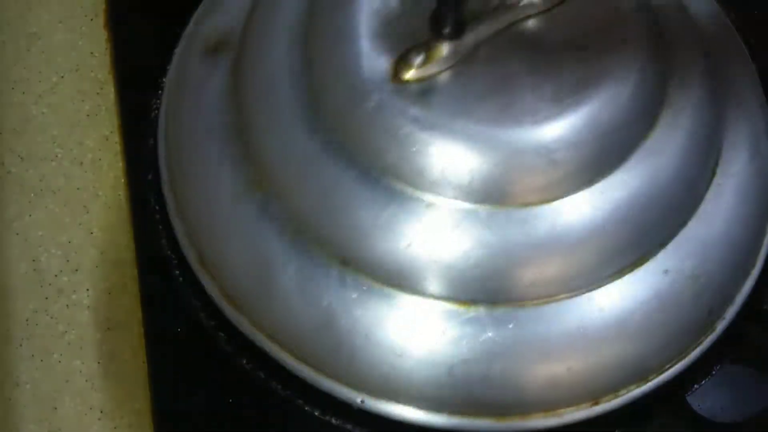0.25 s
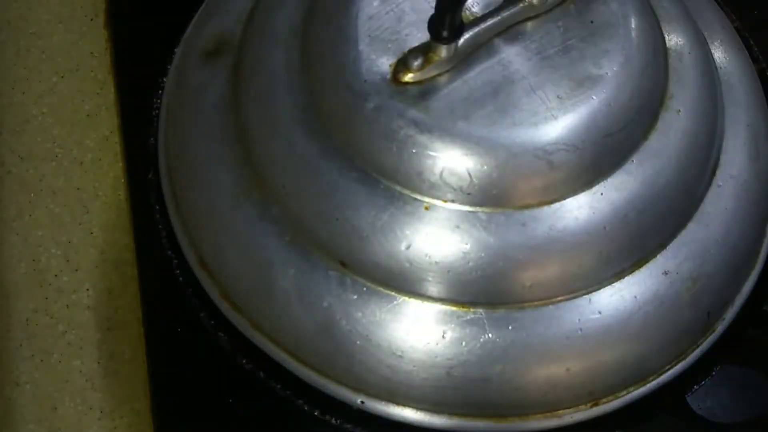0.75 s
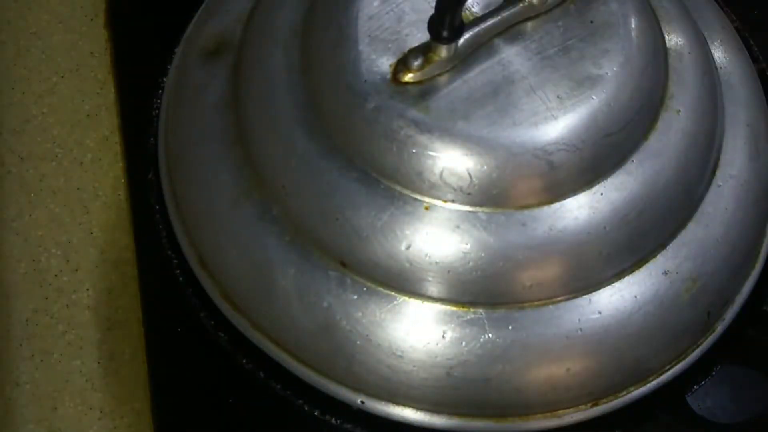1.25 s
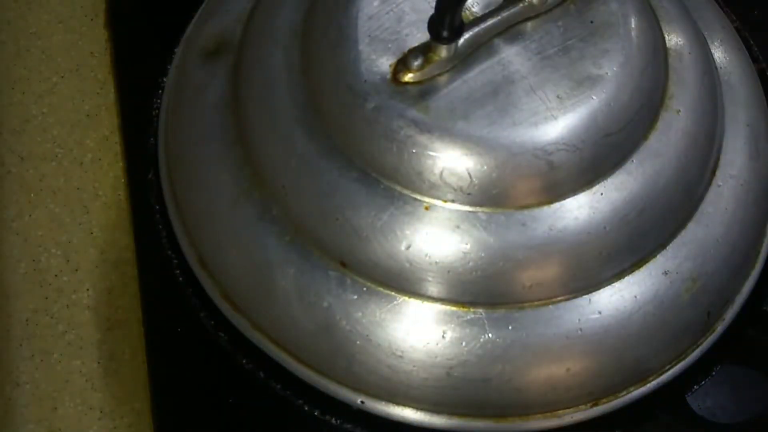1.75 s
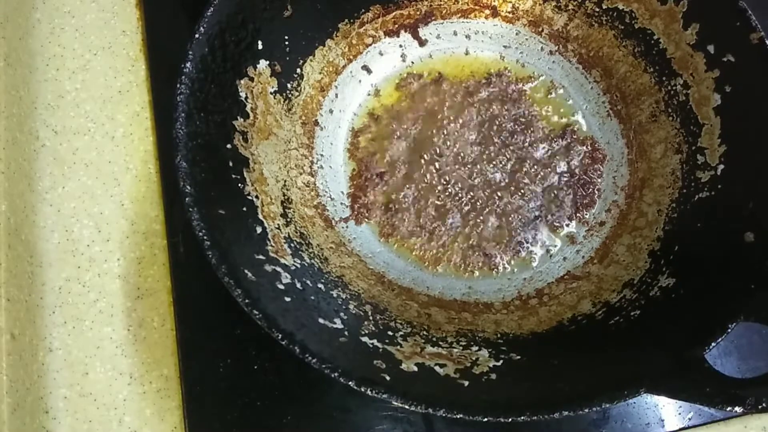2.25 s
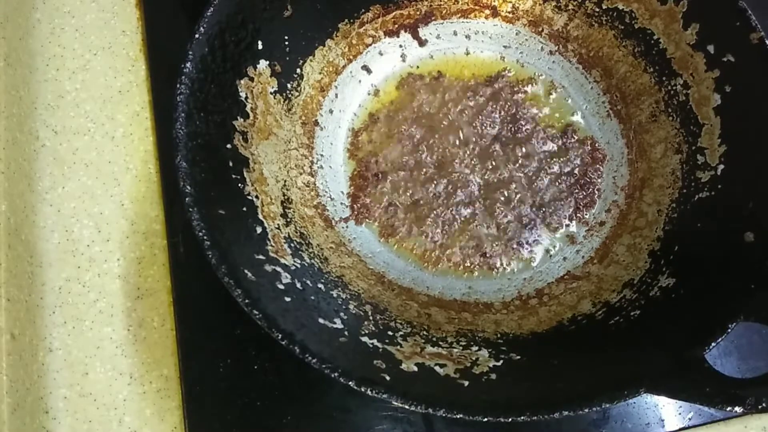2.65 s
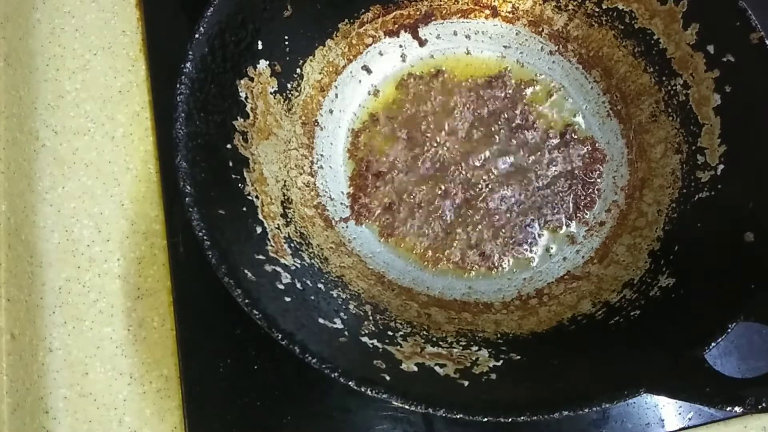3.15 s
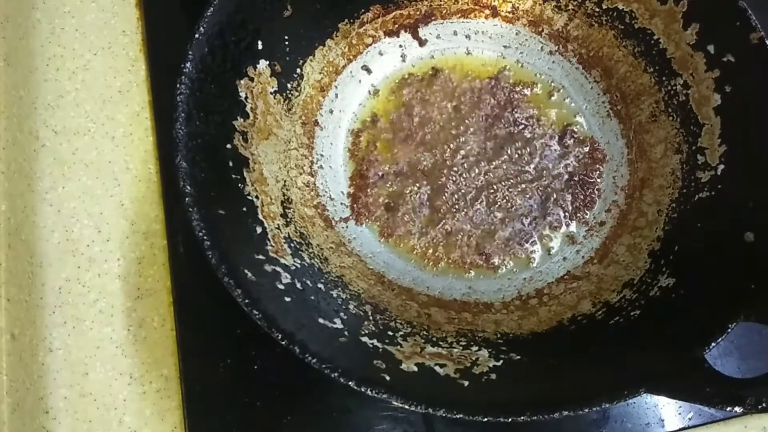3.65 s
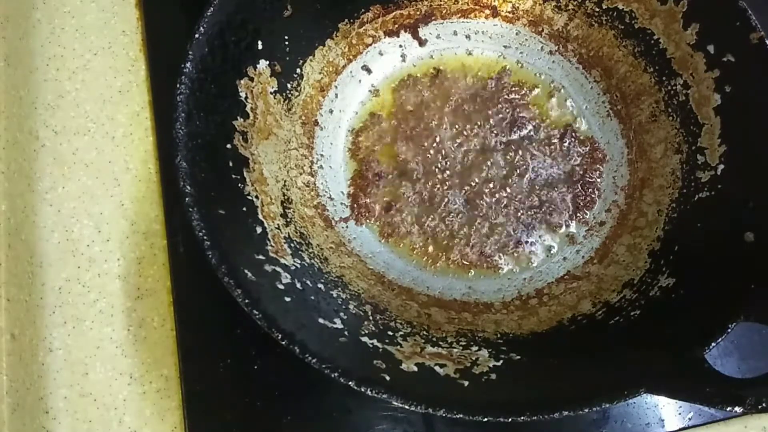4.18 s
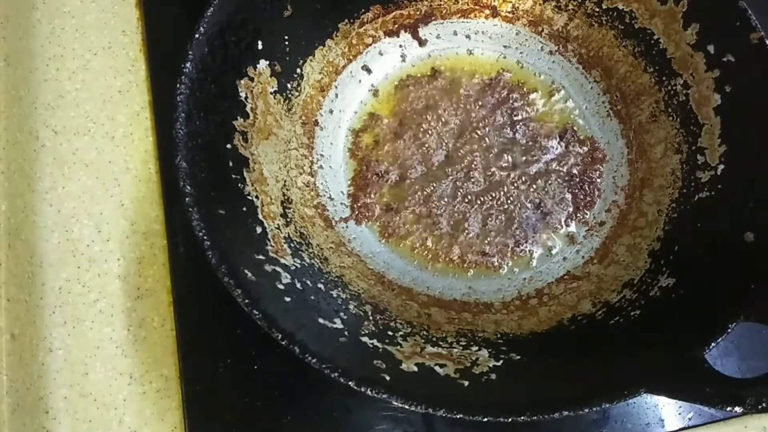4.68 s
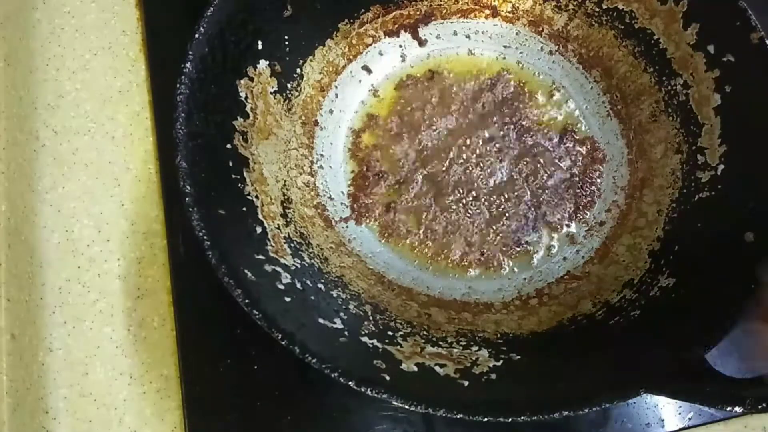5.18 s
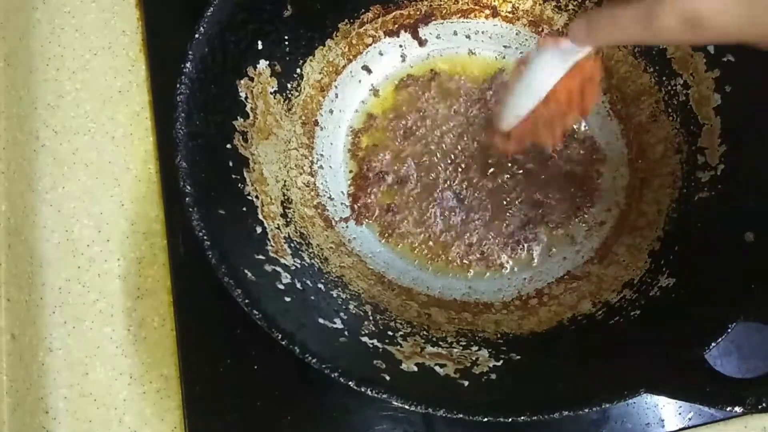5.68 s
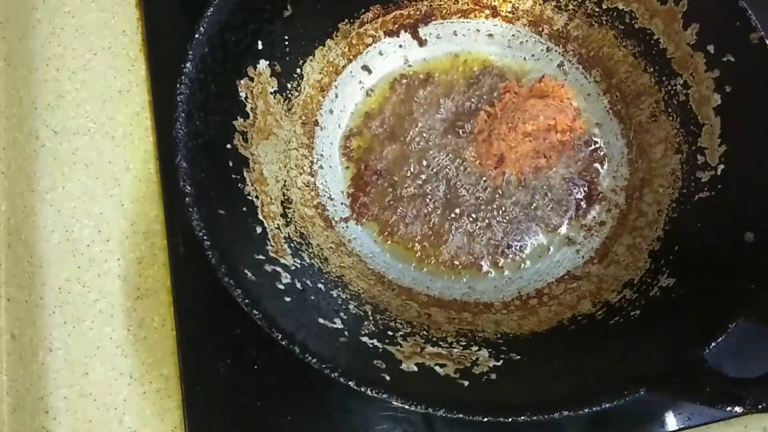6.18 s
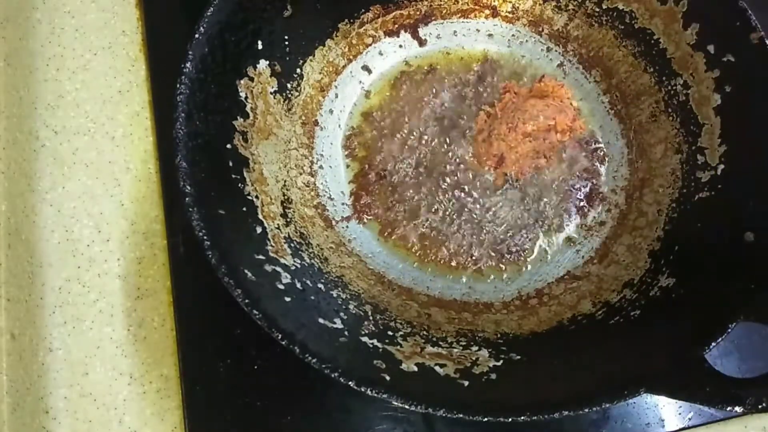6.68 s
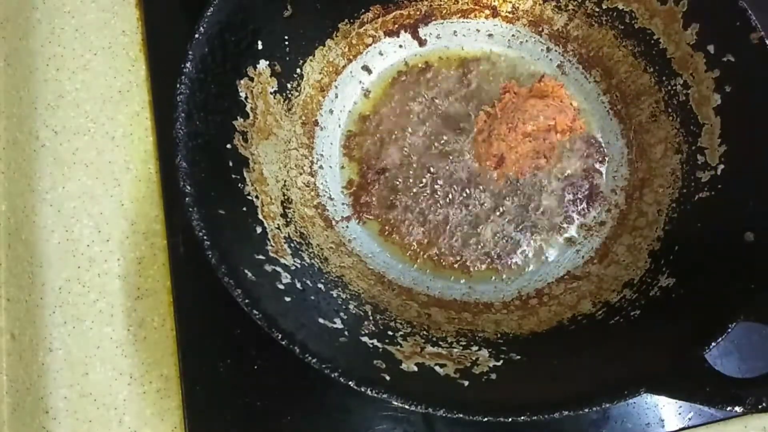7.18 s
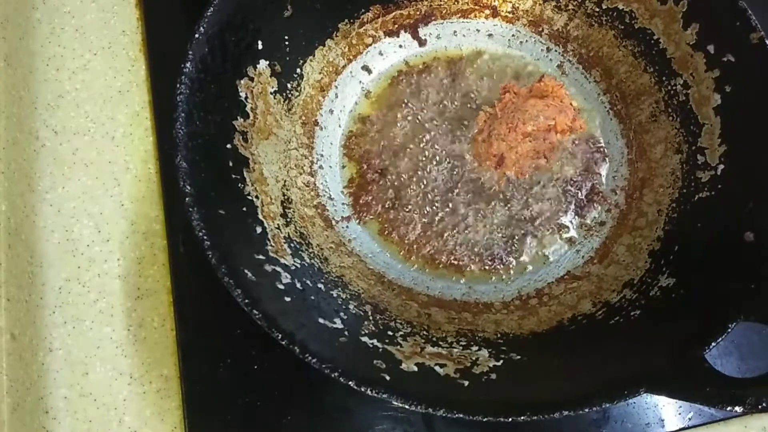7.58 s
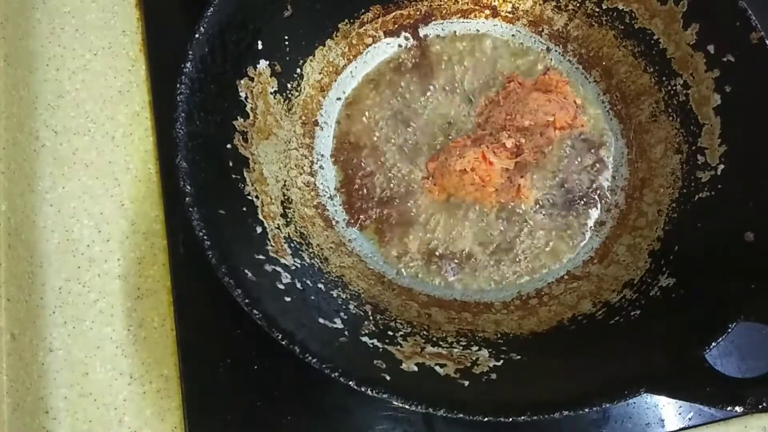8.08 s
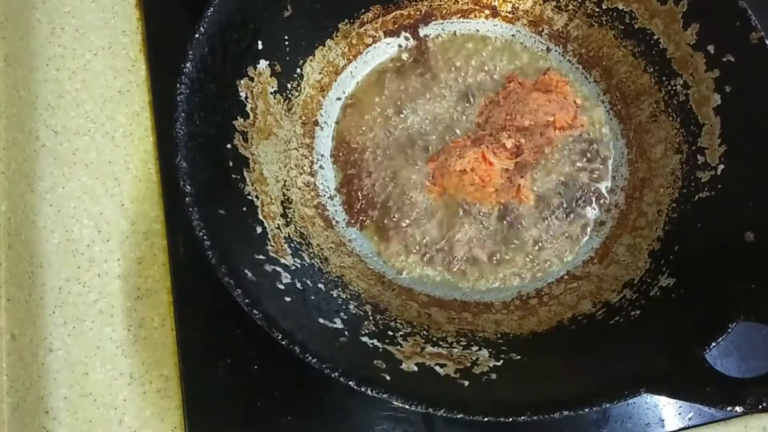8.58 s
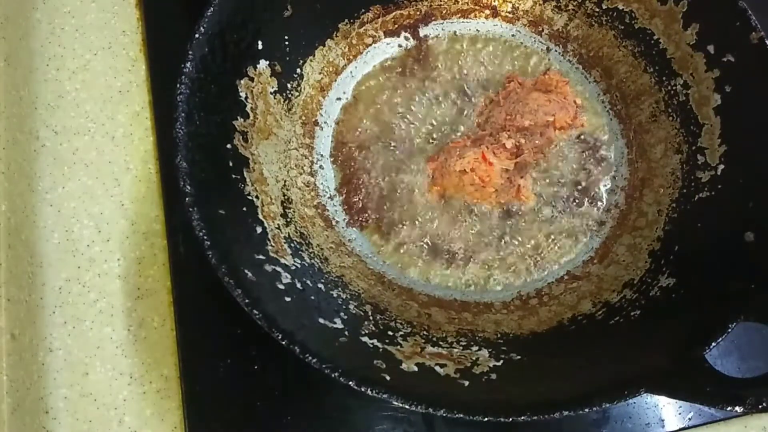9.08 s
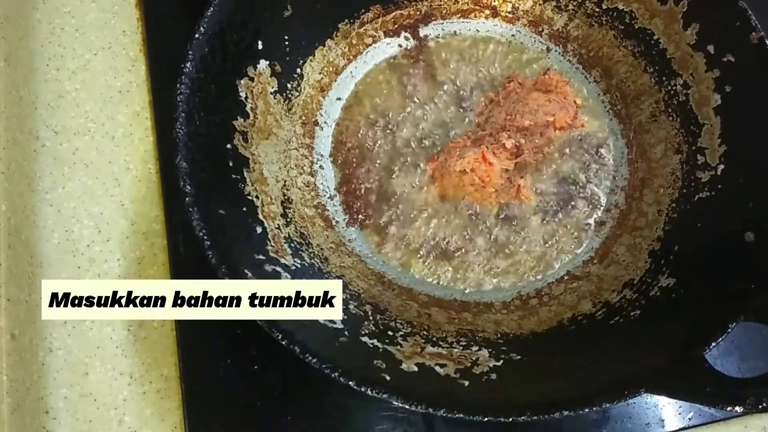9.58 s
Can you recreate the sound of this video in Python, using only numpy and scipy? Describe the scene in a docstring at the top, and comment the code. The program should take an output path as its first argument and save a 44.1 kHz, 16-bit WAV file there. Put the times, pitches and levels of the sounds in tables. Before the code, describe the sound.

A handheld stereo microphone sits close to a pan in a small kitchen with low rumble and faint stove hum. At 0 s a metal lid clanks, scrapes and rings in several quick contacts; a low knock at 0.4 s is followed by light rocking taps that fade. Beneath, frying is quiet, muffled and hollow, with soft gulping notes. At about 2 s a tiny dropout cuts to open oil, rapidly much louder: crisp crackle, irregular pops, snaps and spitting droplets, with faint low steam whistles at first. A short dull knock lands at 4.45 s. From 5.9 s wet paste makes the sizzle denser, brighter and hissier, with fewer distinct pops; a soft low knock follows at 6.3 s. Another tiny dropout comes at 8.04 s, then a left-side microphone bump at 8.3 s. The fizz continues, flaring briefly at 9.4 s, with a short sharp steam squeak at 9.65 s.

```python
"""A small kitchen, a hand-held camera's two microphone ports close to a wok of sizzling oil, a stove humming.
A metal lid clanks, rocks and muffles the frying; with it off, bubbles crackle, spit and whistle, and
a spoonful of wet spice paste turns the crackle into a denser, brighter fizz.
Frying is short bubble bursts and filtered hiss; metal is dying modes and scraping noise; knocks are
low notes with clatter; whistles are unsteady tones; rumble is shaped noise and hum is sines."""
import sys
import numpy as np
from scipy import signal
from scipy.fft import rfft, irfft
from scipy.io import wavfile
from scipy.ndimage import uniform_filter1d

SR = 44100
rng = np.random.default_rng(int(sys.argv[2]) if len(sys.argv) > 2 else 0)


def generate_wav(sig):
    """Save sig (samples, or channels by samples) to the path in sys.argv[1] as 16-bit PCM at SR."""
    pcm = np.round(np.clip(np.atleast_2d(sig).T, -1, 1) * 32767).astype(np.int16)
    wavfile.write(sys.argv[1], SR, pcm)


N = 433944
TIME, FREQ = np.arange(N) / SR, np.fft.rfftfreq(N, 1 / SR)
LID_OFF_S, PASTE_IN_S = 2.025, 5.88


def amp(db):
    """Decibels to gain."""
    return 10 ** (np.asarray(db) / 20)


def unit(x):
    """Scales to rms 1."""
    return x / np.sqrt(np.mean(x ** 2) + 1e-20)


def read(points, hz=FREQ):
    """Reads a spectrum on a log-frequency axis."""
    f, value = np.transpose(points)
    return np.interp(np.log(hz + 1), np.log(f), value)


def colour(x, gain):
    """Filters a full-length sound by a gain at each frequency."""
    return irfft(rfft(x) * gain, N)


def band(x, lo_hz, hi_hz, order=2):
    """Causal band-pass."""
    edges = [lo_hz, min(hi_hz, SR / 2 - 1)]
    return signal.sosfilt(signal.butter(order, edges, "band", fs=SR, output="sos"), x)


def add(mix, s, sound):
    """Mixes a sound in at time s."""
    part = mix[:, max(round(s * SR), 0):][:, :sound.shape[-1]]
    part += sound[..., :part.shape[1]]


def fade(t, t60):
    """Exponential decay by 60 dB in t60 seconds."""
    return np.exp(-np.log(1000) * t / t60)


def ring(modes, spread):
    """Dying modes; each reaches the two ports with its own phase."""
    t = TIME[:SR]
    skews = spread * rng.standard_normal((len(modes), 1, 1)) * np.array([[-1], [1]])
    out = 0
    for (hz, db, t60), skew in zip(modes, skews):
        phase = 2 * np.pi * hz * t + skew * min(hz / 2000, 1)
        out = out + amp(db) * fade(t, t60) * np.sin(phase)
    return out


# kitchen rumble before levelling: (frequency [Hz], relative level [dB])
RUMBLE_SPECTRUM = [(20, -32), (30, -15), (48, -5), (80, -1.5), (140, 4), (195, 0), (260, -3.5), (420, -6),
                   (800, -15), (1400, -18), (2000, -14), (8000, -35)]
# stove hum: (frequency [Hz], rms level before wavering [dB])
STOVE_HUM = [(99.6, -65), (196, -74.5)]


def kitchen(rumble_db=-62, waver_db=2.0, apart=0.57):
    """Low rumble, nearly the same at both ports, and the wavering hum of the stove."""
    noise = rng.standard_normal(N) + apart * rng.standard_normal((2, N))
    rumble = unit(colour(noise, amp(read(RUMBLE_SPECTRUM))))
    waver = amp(waver_db * unit(colour(rng.standard_normal(N), np.exp(-FREQ / 6))))
    hum = 0
    for hz, db in STOVE_HUM:
        hum = hum + amp(db) * np.sqrt(2) * np.sin(2 * np.pi * (hz * TIME + rng.random()))
    return amp(rumble_db) * rumble + waver * hum


def bubbles(per_s, spread_db, largest_db, lo_hz, hi_hz, cycles, echo, echo_t60, count=22):
    """Countless bursts of a few cycles each, scattered by the curved wall of the wok."""
    t, out = TIME[:768], np.zeros((2, N))
    for hz in np.linspace(lo_hz, hi_hz, count):
        at = rng.integers(0, N, int(per_s * N / SR / count))
        # sizes are skewed towards small bubbles and level off at the largest
        size_db = largest_db * np.tanh(spread_db * rng.exponential(1, len(at)) / largest_db)
        clicks = np.zeros(N)
        clicks[at] = amp(size_db) * rng.choice([-1, 1], len(at))
        grain = unit(np.sin(2 * np.pi * hz * t) * np.sqrt(t) * np.exp(-t * hz / cycles))
        scatter = unit(rng.standard_normal((2, len(t))) * fade(t, echo_t60))
        paths = echo * scatter / np.sqrt(len(t))
        paths[[0, 1], rng.integers(0, 5, 2)] += 1  # direct sound, up to 4 samples late
        heard_grain = signal.fftconvolve(paths, grain[None])[:, :len(t)]
        out += signal.oaconvolve(clicks[None], heard_grain, axes=1)[:, :N]
    # every pitch is given a nearly equal share of the power
    spectrum = rfft(out)
    power = uniform_filter1d(abs(spectrum) ** 2, size=3000, axis=1)
    return unit(irfft(spectrum / np.sqrt(power + 1e-6 * power.mean()), N))


def ticks(lo_hz, hi_hz, range_db, shortest_cycles, longest_cycles, count):
    """Single bubbles near the surface, from a dry snap to a tiny pitched ping."""
    out, t = np.zeros((2, N)), TIME[:384]
    for when, pitch, size, length, left_turns, right_turns in rng.random((count, 6)):
        hz = lo_hz + (hi_hz - lo_hz) * pitch
        cycles = shortest_cycles * (longest_cycles / shortest_cycles) ** length
        tone = np.sin(2 * np.pi * (hz * t + np.array([[left_turns], [right_turns]])))
        ping = tone * (1 - np.exp(-t * hz)) * np.exp(-t * hz / cycles)
        add(out, when * N / SR, amp(-range_db * size) * unit(ping))
    return unit(out)


# frying colour in open oil, with wet paste, and leaking past the lid: (frequency [Hz], relative level [dB])
OPEN_OIL_COLOUR = [(200, -102), (550, -15), (720, -29.5), (880, -17.5), (1250, -23), (1480, -9),
                   (1900, -5.5), (2200, -8.5), (3600, -3), (4700, 0.5), (5800, 0), (6800, -8), (9200, -12),
                   (11500, -20.5), (15000, -17.5)]
WET_PASTE_COLOUR = [(200, -64), (550, -23), (740, -26.5), (900, -19), (1200, -20), (1900, -12),
                    (2400, -11.5), (3600, -7), (4700, 0), (5800, 0), (6800, -8), (9200, -10.5),
                    (11500, -19), (15000, -15)]
UNDER_LID_COLOUR = [(200, -19), (550, -17), (800, -35), (1400, -27), (1900, -17.5), (2800, -18.7),
                    (3400, -18), (4200, -18), (4700, -11), (6000, -12), (7000, -16), (9200, -18.5),
                    (11500, -27), (15000, -26)]
# resonances of the air under the lid: (frequency [Hz], width [Hz], lift [dB])
LID_AIR_RESONANCES = [(470, 52, 11), (615, 46, 15.5), (890, 40, 11), (1025, 240, 22), (1640, 69, 15),
                      (1730, 54, 13), (2047, 84, 14.5), (2290, 110, 8), (2500, 130, 12), (2775, 74, 9.5),
                      (3100, 110, 10), (3740, 170, 7), (3930, 90, 7.5), (4600, 160, 7), (4900, 90, 4),
                      (5460, 150, 9), (6030, 120, 8.5)]
# how hard the oil boils covered, as the lid comes off, in the open, and with the paste in;
# levels before each stage's trim: (time [s], fine bubbles level [dB], coarse bubbles level [dB])
COVERED_BOIL = [(0.3, -54, -65.5), (0.48, -57.5, -69), (1.97, -58, -68.5)]
UNCOVERING_BOIL = [(2.06, -58, -63), (2.102, -48, -47), (2.27, -42, -48)]
OPEN_BOIL = [(2.33, -40, -44.5), (5.78, -40.5, -46.5), (5.85, -40, -46)]
PASTE_BOIL = [(5.9, -40, -44), (6.01, -38, -44), (8.14, -38, -44.5), (8.23, -38.5, -41.5),
              (8.36, -38.5, -44.5), (9.33, -38.5, -45.5), (9.38, -38.5, -42.5), (9.45, -38.5, -47.5),
              (9.6, -39.5, -46.5)]
SPLIT_HZ = 3420  # coarse bubbles sound mostly below this pitch, fine ones above
TICKS_DB = -7.5  # single ticks against the fine fizz


def frying(lid_hiss=1.2, open_hiss=0.39, paste_hiss=0.78, surge_db=1.52, smooth_hz=12500):
    """Fine and coarse bubbles and sharp ticks surge over hiss, coloured by the state of the pan."""
    fine = bubbles(per_s=4000, spread_db=7.0, largest_db=18.0, lo_hz=3750, hi_hz=12760,
                   cycles=2.1, echo=1.1, echo_t60=0.04)
    coarse = bubbles(per_s=1300, spread_db=3.5, largest_db=10, lo_hz=699, hi_hz=4210,
                     cycles=1.98, echo=0.78, echo_t60=0.037)
    snaps = ticks(lo_hz=3536, hi_hz=13100, range_db=10.5, shortest_cycles=1.4,
                  longest_cycles=10.4, count=2000)
    fine = unit(fine + amp(TICKS_DB) * snaps)
    unrest = unit(colour(rng.standard_normal(N), 1 / (1 + (FREQ / 30) ** 2)))
    surge = amp(stirring() + surge_db * unrest)
    hollow_db = sum(db / (1 + (2 * (FREQ - hz) / width) ** 2) for hz, width, db in LID_AIR_RESONANCES)
    low_share = 1 / (1 + (FREQ / SPLIT_HZ) ** 10)
    merged = 0.79 / (1 + (smooth_hz / (FREQ + 1)) ** 10)  # the tiniest bubbles merge into hiss
    sizes = []
    for grains, share in ((fine, 1 - low_share), (coarse, low_share)):
        sizes.append((rfft(grains * surge), rfft(rng.standard_normal((2, N))), share))

    def stage(boil, shape_db, hiss_share, fine_db, coarse_db):
        """The frying in one state of the pan, crackle and hiss following its boil levels."""
        s, fine_curve, coarse_curve = np.transpose(boil)
        blend, out = hiss_share + merged, np.zeros((2, N))
        curves = (fine_curve + fine_db, coarse_curve + coarse_db)
        for (crackle, hiss, share), curve in zip(sizes, curves):
            gain = amp(shape_db) * np.sqrt(share / (1 + blend ** 2))
            sound = irfft((crackle + blend * hiss) * gain, N)
            out += amp(np.interp(TIME, s, curve)) * sound / sound.mean(0).std()
        return out

    covered = stage(COVERED_BOIL, read(UNDER_LID_COLOUR) + hollow_db, lid_hiss,
                    fine_db=5.0, coarse_db=6.5)
    uncovered = stage(UNCOVERING_BOIL + OPEN_BOIL, read(OPEN_OIL_COLOUR), open_hiss,
                      fine_db=-0.07, coarse_db=0.7)
    with_paste = stage(PASTE_BOIL, read(WET_PASTE_COLOUR), paste_hiss, fine_db=1.35, coarse_db=0.5)
    lid_off = np.where(TIME < PASTE_IN_S, uncovered, with_paste)
    return np.where(TIME < LID_OFF_S, covered, lid_off)


# ring of the wok: (frequency [Hz], relative level [dB], decay t60 [s])
WOK_MODES = [(1056, 17, 0.058), (1225, 10, 0.32), (1389, 5.5, 0.61), (1530, 8, 0.21), (1654, 12.5, 0.2),
             (1963, 14, 0.18), (2946, 13, 0.12), (3700, 7, 0.16)]


def wok(x, ring_db=6.0):
    """The bursts set the iron ringing faintly, by convolution with its dying modes."""
    tail = ring(WOK_MODES, spread=0.24)
    return x + amp(ring_db) * signal.oaconvolve(x, tail / abs(rfft(tail)).max(), axes=1)[:, :N]


# ring of the lid: (frequency [Hz], relative level [dB], decay t60 [s])
LID_MODES = [(80.1, -4.5, 0.87), (134.2, -6.5, 0.54), (305, -9, 0.23), (460.6, -2.5, 0.35), (482, 10, 0.13),
             (524, -4, 0.24), (618, -4, 0.4), (703, 1, 0.3), (1027, -2, 0.3), (1043, 1, 0.35),
             (1092, -0.5, 0.36), (1370, -14, 0.56), (1713, -4, 0.48), (1950, -1, 0.2), (2040, 12.5, 0.15),
             (2136, -3.5, 0.55), (2480, -9, 0.33), (2540, 1.5, 0.19), (2630, -6, 0.15), (2880, 2, 0.19),
             (3010, -14, 0.3), (3330, -12, 0.33), (3763, -2, 0.16), (4040, -9, .16), (4130, -12, 0.25),
             (4280, 0, 0.22), (4740, -5, 0.22), (5240, 0, 0.17), (5360, -4, .2)]
# the lid rubs and bumps on the rim: (time [s], level [dB], lowest excited [Hz], highest excited [Hz],
# scrape against the ring [dB], rise [s])
LID_CLANKS = [(0.0, -34.5, 600, 7000, -3.5, 0.00045), (0.062, -40, 60, 750, -8, 0.013),
              (0.097, -36, 80, 1150, -8, .0016), (0.121, -47.5, 900, 3500, -3, 0.0014),
              (.252, -61, 60, 700, -10, .004)]
# the rim jostles the modes a little, and they reach the two ports slightly out of phase (radians)
LID_CHATTER, LID_SPREAD = 0.38, 0.55


def lid(chatter_hz=45, scrape_t60=0.38, scrape_bright=0.94, rubbed_t60=0.033, rasp_db=-3, rasp_from_hz=3500):
    """The lid rings, chatters and scrapes; soft contacts ring low modes, glancing ones high modes."""
    out, t = np.zeros((2, N)), TIME[:SR]
    attack = round(.04 * SR)  # levels are set over the first 40 ms
    # the same modes, damped by the contact
    rubbed = ring([(hz, level, rubbed_t60) for hz, level, _ in LID_MODES], spread=0)
    knots = np.arange(200) / chatter_hz
    for s, db, low_hz, soft_hz, scrape_db, rise_s in LID_CLANKS:
        tone, rise = np.zeros((2, SR)), 1 - np.exp(-t / rise_s)
        for hz, level, t60 in LID_MODES:
            chatter = 1 + LID_CHATTER * np.interp(t, knots, rng.standard_normal(len(knots)))
            mode = ring([(hz, level, t60)], spread=LID_SPREAD)
            unexcited = np.sqrt((1 + (hz / soft_hz) ** 4) * (1 + (low_hz / hz) ** 2))
            tone += chatter * mode * rise / unexcited
        friction = rng.standard_normal(SR) + 1.04 * rng.standard_normal((2, SR))
        rubbing = unit(signal.fftconvolve(friction, rubbed, axes=1)[:, :SR])
        rubbing = rubbing + amp(rasp_db) * unit(band(friction, rasp_from_hz, 6700, order=4))
        scrape = band(rubbing, 57, scrape_bright * soft_hz, order=2) * fade(t, scrape_t60) * rise
        ringing = tone / tone[:, :attack].std()
        scraping = scrape / scrape[:, :attack].std()
        add(out, s, amp(db) * (ringing + amp(scrape_db) * scraping))
    return out


# drips under the lid strike the pan and ring the lid: (time [s], level before blip_db [dB])
LID_DRIPS = [(0.296, -53), (0.565, -57), (0.816, -52.5), (1.202, -56), (1.347, -53)]


def blips(hz=1040, t60=0.13, rise_s=0.0063, blip_db=6.5, faint_db=-61, count=24):
    """Drips under the lid strike the pan and ring a hollow note of the lid; fainter ones come at random."""
    out, t = np.zeros((2, N)), TIME[:SR // 4]
    faint_times = (np.arange(count) + rng.random(count)) / count * (LID_OFF_S - t60)
    for s, db in LID_DRIPS + [(s, faint_db) for s in faint_times]:
        pitch = hz * (1 + 0.016 * rng.standard_normal())
        note = np.sin(2 * np.pi * pitch * t) * fade(t, t60) * (1 - np.exp(-t / rise_s))
        add(out, s, amp(db + blip_db) * note)
    return out


def settling(start_s=0.23, level_db=-51, t60=2.2, top_hz=520, lumps_db=-0.5):
    """The lid shifts on the rim with a lumpy rumble of filtered noise that dies away."""
    noise = rng.standard_normal(N) + 0.32 * rng.standard_normal((2, N))
    rumble = unit(band(noise, 66, top_hz, order=3))
    lumps = amp(lumps_db * unit(colour(rng.standard_normal(N), np.exp(-FREQ / 15))))
    return amp(level_db) * rumble * lumps * (TIME > start_s) * fade(abs(TIME - start_s), t60)


# dull knocks on the pan and worktop: (time [s], level [dB], pitch [Hz], decay t60 [s],
# clatter level [dB], clatter cut-off [Hz], clatter decay t60 [s])
DULL_KNOCKS = [(0.412, -30.5, 196, 0.22, -40.5, 336, 0.21), (4.448, -21, 806, 0.018, -45, 1020, 0.17),
               (4.449, -39, 536, 0.1, -51, 200, 0.16), (4.464, -39, 89, 0.13, -48, 210, 0.16),
               (4.467, -43, 189, 0.13, -51, 400, 0.13), (6.257, -50, 192, 0.56, -53, 715, 0.6),
               (6.33, -60, 310, .15, -54, 700, 0.33)]


def knocks(rise_s=0.0058):
    """Dull knocks, each one low dying note and a little clatter of low noise."""
    out, t = np.zeros((2, N)), TIME[:SR // 2]
    for s, db, hz, t60, clatter_db, top_hz, clatter_t60 in DULL_KNOCKS:
        noise = rng.standard_normal(len(t)) + 0.58 * rng.standard_normal((2, len(t)))
        clatter = unit(band(noise, 74, top_hz, order=4)) * fade(t, clatter_t60)
        note = np.sin(2 * np.pi * hz * t) * fade(t, t60)
        knock = amp(db) * note + amp(clatter_db) * clatter
        add(out, s, knock * (1 - np.exp(-t / rise_s)))
    return out


# the lid rocks on the rim, ever more lightly: (time [s], level [dB])
LID_ROCKS = [(0.456, -43), (0.522, -46), (0.646, -47.5), (0.779, -51.5), (1.025, -52), (1.636, -52)]


def rocking(hz=618, t60=0.094, rise_s=0.0025, clatter_db=-9, clatter_top_hz=560, clatter_t60=0.14):
    """Each time the lid rocks it gives the same short note and a little clatter."""
    out, t = np.zeros((2, N)), TIME[:SR // 2]
    for s, db in LID_ROCKS:
        clatter = unit(band(rng.standard_normal(len(t)), 90, clatter_top_hz, order=4))
        note = np.sin(2 * np.pi * hz * t) * fade(t, t60)
        tap = note + amp(clatter_db) * clatter * fade(t, clatter_t60)
        add(out, s, amp(db) * tap * (1 - np.exp(-t / rise_s)))
    return out


# unsteady tones, a faint ring of the wok after the lid comes off and squeaks from the paste: (time [s], pitch
# [Hz], level [dB], length [s], flutter [share of pitch], # hiss against the note [dB])
UNSTEADY_TONES = [(2.09, 1362, -58, 0.12, .005, -14), (2.368, 1362, -55, 0.24, .006, -12),
                  (9.367, 2950, -38.5, 0.027, 0.05, 4), (9.643, 2758, -33.5, 0.065, 0.009, -4),
                  (9.656, 2717, -24.5, 0.024, 0.009, -12)]


def unsteady_tones(hiss_below=0.6, hiss_above=1.9):
    """Unsteady notes, each in a puff of hiss: a faint low ring of the wok near 1.36 kHz, and squeaky whistles
    from the paste."""
    out = np.zeros((2, N))
    for s, hz, db, length, flutter, hiss_db in UNSTEADY_TONES:
        t = TIME[:int(length * SR)]
        wander = unit(uniform_filter1d(rng.standard_normal(SR), size=60))
        pitch = hz * (1 + flutter * wander)[:len(t)]
        noise = rng.standard_normal((2, SR))
        hiss = unit(band(noise, hiss_below * hz, hiss_above * hz, order=3))[:, :len(t)]
        note = np.sin(2 * np.pi * np.cumsum(pitch) / SR)
        add(out, s, amp(db) * (note + amp(hiss_db) * hiss) * np.sqrt(np.hanning(len(t))))
    return out


FILM_T60 = 0.033  # s, how long the film of a large bubble crackles


def burst(hz, note_db, crack_db, spray_db, cycles=6, lowest_hz=1300, rise_s=0.00033,
          droplet_lag_s=.0045, droplet_cycles=6, count=9):
    """A bubble rings a short clean note as its film cracks, and flings droplets that land with high pings."""
    t, attack = TIME[:2048], round(.008 * SR)  # levels are set over the first 8 ms
    rise = 1 - np.exp(-t / rise_s)
    shared, left, right = rng.standard_normal((3, len(t)))
    tone = np.sin(2 * np.pi * hz * t + 0.66 * rng.standard_normal((2, 1)))
    note = tone * np.exp(-t * hz / cycles)
    crackle = (shared + 1.1 * np.array([left, right])) * fade(t, FILM_T60) * rise
    film = band(crackle, lowest_hz, 3800, order=5)
    spray = np.zeros((2, len(t)))
    for order, (wait, pitch, left_turns, right_turns) in enumerate(rng.random((count, 4))):
        age = np.maximum(t - droplet_lag_s * order * wait / 2, 0)  # stays 0 until the droplet lands
        ping_hz = 3800 + 2100 * pitch
        ping = np.sin(2 * np.pi * (ping_hz * age + np.array([[left_turns], [right_turns]])))
        envelope = (1 - np.exp(-age * ping_hz)) * np.exp(-age * ping_hz / droplet_cycles)
        spray += ping * envelope / np.sqrt(3 + order)
    note = band(note * rise, 1270, 5000, order=4)
    spray = band(spray, 3500, 6300, order=3)
    parts = ((note_db, note), (crack_db, film), (spray_db, spray))
    return sum(amp(db) * part / part[:, :attack].std() for db, part in parts)


# the largest bubbles bursting, levels before the trims in spits(): (time [s], note level [dB],
# note pitch [Hz], crack of the film level [dB], spray level [dB])
LARGE_BURSTS = [(2.093, -47.4, 3390.0, -44, -44), (2.1888, -47.2, 1990.0, -41, -36),
                (2.1964, -35, 1870, -41, -47), (2.289, -34.8, 1400.0, -32.5, -34.5),
                (2.4014, -38, 1690, -33, -36), (2.4648, -44, 2900.0, -45, -35),
                (2.5017, -36, 3430.0, -37, -35), (2.6536, -44, 1940.0, -39, -32),
                (2.6792, -35.5, 3350, -46, -38), (2.8382, -44, 2960, -42, -45),
                (2.9, -44.6, 3190.0, -48, -36), (3.0476, -43, 1900, -49, -35),
                (3.0833, -35, 1860, -30.5, -51), (3.0948, -36.1, 3520, -42, -49),
                (3.1328, -47, 2100.0, -41, -35.5), (3.2306, -38, 2390.0, -38, -31.5),
                (3.2419, -44, 1910.0, -38, -42), (3.2693, -43, 1740.0, -40, -49),
                (3.2983, -36, 1800, -28.5, -49), (3.3216, -39.6, 1920.0, -39, -31),
                (3.3685, -39, 1630, -33, -37), (3.3977, -38, 1680, -36, -42),
                (3.4173, -40, 2390.0, -38, -46), (3.531, -41, 2840.0, -51, -45),
                (3.5587, -36, 1510, -30, -41), (3.5651, -39.8, 3100.0, -43, -36),
                (3.5772, -39.6, 2490.0, -48, -51), (3.6015, -37, 2850.0, -40, -41),
                (3.6948, -35.5, 1585, -37, -33), (3.7306, -42, 1650.0, -37.5, -34),
                (3.8835, -45.8, 3460.0, -44, -50), (3.9054, -38.1, 1530.0, -35, -34),
                (3.9379, -41, 1820, -41, -34), (3.9573, -46, 2920.0, -32, -35),
                (4.0412, -36, 1860, -39, -43), (4.121, -44, 3470.0, -38, -40),
                (4.2492, -41, 3540.0, -43, -49), (4.2582, -43, 2440.0, -56, -30),
                (4.3215, -35.5, 2640, -36, -37), (4.385, -42, 2310.0, -39, -47),
                (4.4045, -40.0, 1890.0, -46, -39), (4.4234, -45, 2870.0, -35, -47),
                (4.4651, -39, 3450, -41, -36), (4.5838, -39, 2080, -46, -51),
                (4.6363, -40, 2520.0, -32, -43), (4.674, -45, 2510.0, -39, -32),
                (4.758, -39, 1810.0, -38, -37), (4.7917, -41, 2830.0, -36, -29.5),
                (4.8066, -44.0, 2380.0, -42, -32), (4.8635, -37, 2430, -37.5, -30.5),
                (4.9317, -39.7, 3390.0, -41, -38), (4.9568, -36.5, 2400, -39, -37),
                (5.0217, -50, 2800.0, -39, -38), (5.05, -37.5, 1580, -34, -40),
                (5.1757, -32, 2500.0, -52, -41), (5.195, -48.7, 1750.0, -58, -40),
                (5.2197, -31, 1860.0, -38, -34), (5.2711, -37.5, 2430, -40, -44),
                (5.2992, -42, 2010, -38, -48), (5.312, -40.4, 2910.0, -45, -50),
                (5.372, -37.4, 1910, -52, -49), (5.3993, -45.5, 1460.0, -44, -51),
                (5.5504, -38, 1710.0, -52, -50), (5.5695, -38.5, 3360.0, -38, -36),
                (5.635, -40, 1940, -34.5, -45), (5.72, -40, 2320, -40, -43),
                (5.7621, -46, 3400, -36.5, -31.5), (5.8793, -37, 3400, -39, -45),
                (5.9384, -41, 2620.0, -37, -34), (5.9652, -34.5, 2570, -39, -42),
                (5.9769, -41.9, 2600, -43, -37), (6.1097, -51, 2530.0, -43, -32),
                (6.2573, -41.7, 2890.0, -40, -33), (6.7736, -41, 2120, -48, -47),
                (6.8777, -47, 3500, -48, -38), (6.9131, -47, 2600, -57, -33),
                (7.0822, -40.7, 3540.0, -52, -40), (7.1653, -37.5, 2440.0, -46, -37),
                (7.333, -39, 2290, -38, -38), (7.3571, -38, 1720, -42, -47), (7.4042, -47, 3500, -42, -31),
                (7.653, -43.7, 1620, -40, -28.5), (8.2278, -41, 2850, -46, -32),
                (8.285, -44.2, 3480.0, -45, -43), (8.301, -43.7, 3240.0, -37.5, -45),
                (8.8743, -48, 3430, -60, -30), (9.0668, -40.8, 2870, -39, -31.5),
                (9.3923, -44, 3010.0, -39, -42), (9.4123, -44.1, 3430.0, -43, -36),
                (9.6945, -43, 2730.0, -52.5, -31.5), (9.8235, -33, 3020, -43, -33)]


def spits(note_db=0.3, crack_db=-1.14, spray_db=0.0):
    """The largest bubbles stand out from the frying, each a note, a film crack and spray."""
    out = np.zeros((2, N))
    for s, db, hz, film_db, droplets_db in LARGE_BURSTS:
        add(out, s, burst(hz, db + note_db, film_db + crack_db, droplets_db + spray_db))
    return out


# the oil foams up as a large bubble bursts, then calms
STIR_DB, STIR_S, STIR_LEAD_S = 1.2, 0.016, 0.002


def stirring():
    """Extra boiling, in dB, rising and dying exponentially around each large burst."""
    foam = np.zeros(N)
    for s, *_ in LARGE_BURSTS:
        distance = np.maximum((s - TIME) / STIR_LEAD_S, (TIME - s) / STIR_S)
        foam = np.maximum(foam, np.exp(-distance))
    return STIR_DB * foam


# lesser bubbles burst at random: (from [s], to [s], rate [bursts/s], note level [dB], crack level [dB],
# spray level [dB], lowest pitch [Hz], highest pitch [Hz]); levels are before the random spread
LESSER_BURSTS = [(2.3, 5.88, 6, -48.5, -47, -42.5, 1440, 2900),
                 (5.88, 9.84, 5, -48, -45.5, -41, 1750, 3700)]
SPUTTER_SPREAD_DB = 1.5  # scales a random offset of -1.1 to 1


def sputter(count=40):
    """Lesser bubbles burst at loose intervals; the wet paste makes them higher and more spray than pop."""
    out = np.zeros((2, N))
    for start, end, per_s, note_db, crack_db, spray_db, lo_hz, hi_hz in LESSER_BURSTS:
        for k in range(count):
            when, pitch = rng.random(2)
            offsets_db = SPUTTER_SPREAD_DB * rng.uniform(-1.1, 1, 3)
            s = start + (k + when) / per_s
            hz = lo_hz * (hi_hz / lo_hz) ** pitch
            sound = burst(hz, *(offsets_db + [note_db, crack_db, spray_db]))
            if s < end:
                add(out, s, sound)
    return out


# a bump beside the left port, before its band-pass: (time [s], push level [dB],
# push time constant [s], wobble level [dB], wobble pitch [Hz], wobble decay t60 [s])
PORT_BUMP = (8.3177, -12.5, .0009, -22.5, 66, .09)


def bump():
    """A short push and a low dying wobble reach the left port alone."""
    s, push_db, length, wobble_db, hz, t60 = PORT_BUMP
    out, t = np.zeros((2, N)), TIME[:SR // 10]
    wobble = np.sin(2 * np.pi * hz * t) * fade(t, t60)
    push = amp(push_db) * np.exp(-t / length) - amp(wobble_db) * wobble
    add(out[:1], s, band(push, 25, 1500, order=1))
    return out


def room(x, wet_db=-12, t60=0.11):
    """A short tail from the hard kitchen walls, as decaying noise after a 5 ms gap."""
    t = TIME[:SR // 2]
    tail = rng.standard_normal((2, len(t))) * fade(t, t60) * (t > .005)
    return x + amp(wet_db) * signal.oaconvolve(x, tail / np.linalg.norm(tail[0]), axes=1)[:, :N]


def scene():
    """The pan in the room, with the lid, knocks, bump and kitchen close by."""
    pan = room(wok(frying() + spits() + sputter()) + unsteady_tones() + blips())
    return pan + lid() + settling() + rocking() + knocks() + bump() + kitchen()


# the two microphone ports colour the sound differently: (frequency [Hz], left minus right level [dB])
PORT_BALANCE = [(1000, -2), (2000, -3), (3200, -2), (4400, -8), (5400, -12.5), (6300, -6), (7400, 0),
                (8300, 22), (9200, 2.5), (10500, 16), (12000, 0.5), (15000, 0)]
# the sound drops out briefly: (from [s], to [s])
SOUND_DROPOUTS = [(2.005, 2.046), (8.036, 8.056)]
EDGE_HZ = 15600  # upper band limit


def record(dry):
    """Port colour at constant total power, two brief 35 dB dropouts and the band limit."""
    ratio = amp(read(PORT_BALANCE)) ** 2
    port_power = 2 * np.array([ratio, np.ones_like(ratio)]) / (1 + ratio)
    heard = colour(dry, np.sqrt(port_power))
    live = 1. - sum((TIME > start) & (TIME < end) for start, end in SOUND_DROPOUTS)
    heard = heard * np.maximum(uniform_filter1d(live, size=100), amp(-35.0))
    low_pass = signal.firwin(511, EDGE_HZ, window=("kaiser", 9), fs=SR)
    return signal.oaconvolve(heard, low_pass[None], "same")


dry = scene()
out = record(dry)
generate_wav(out)
```